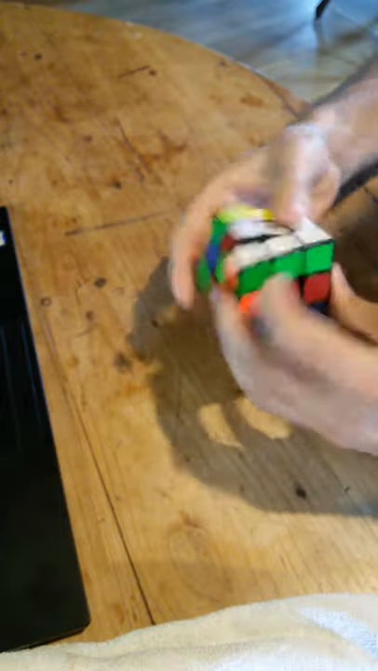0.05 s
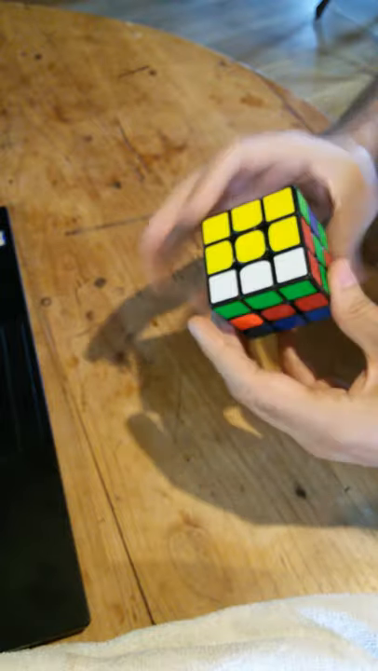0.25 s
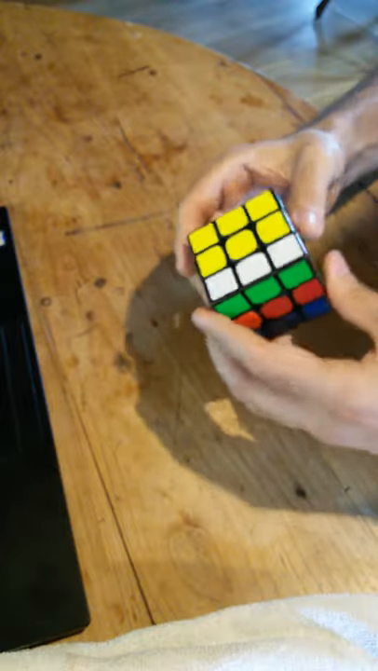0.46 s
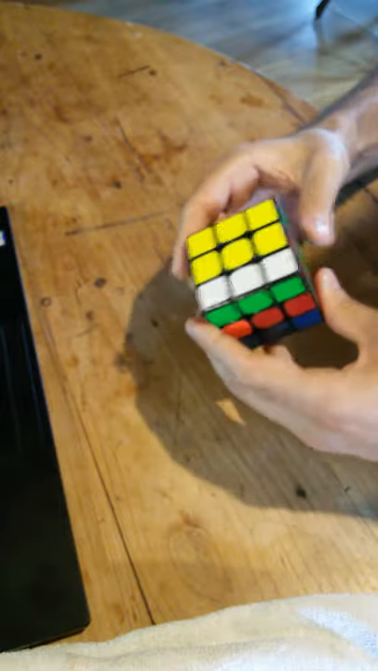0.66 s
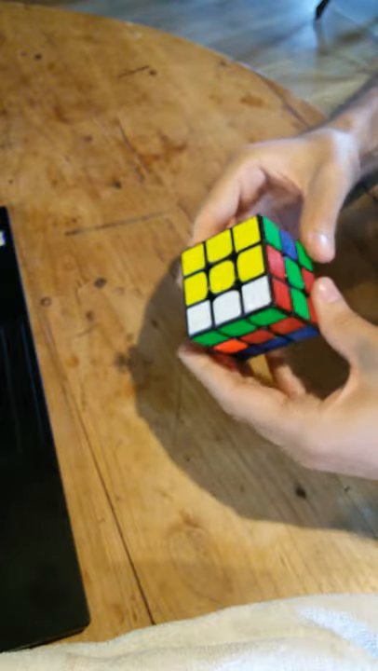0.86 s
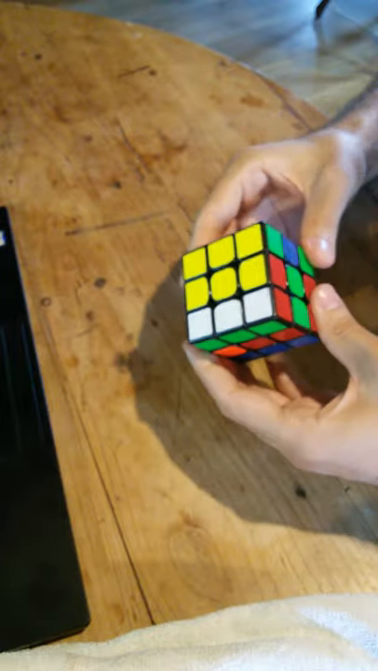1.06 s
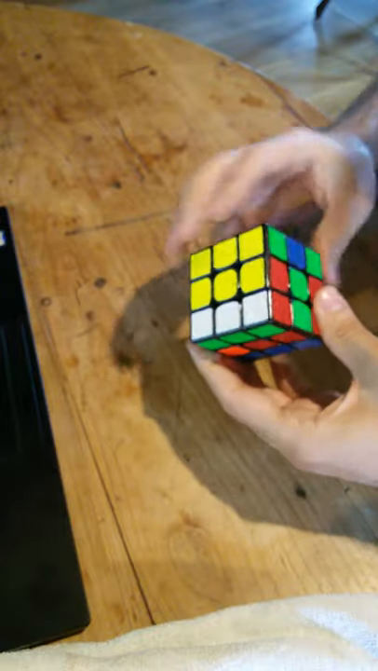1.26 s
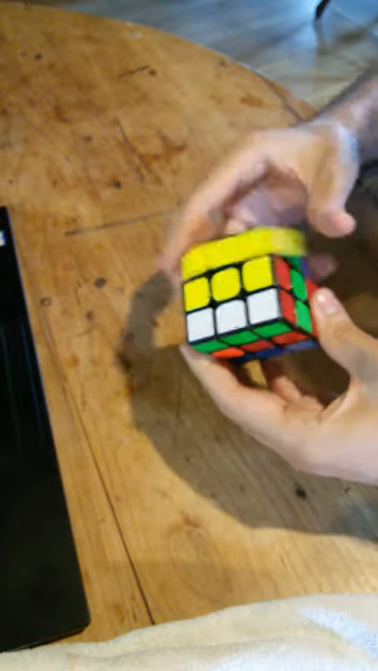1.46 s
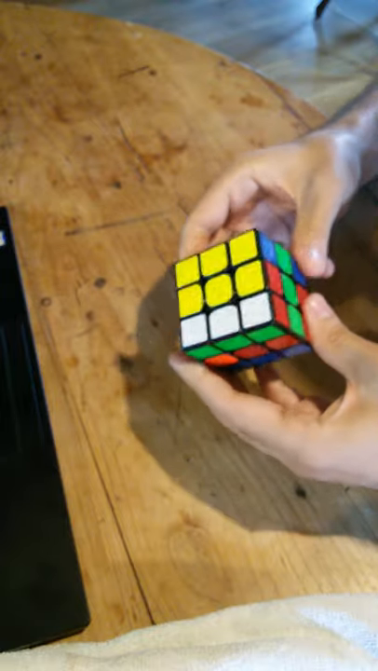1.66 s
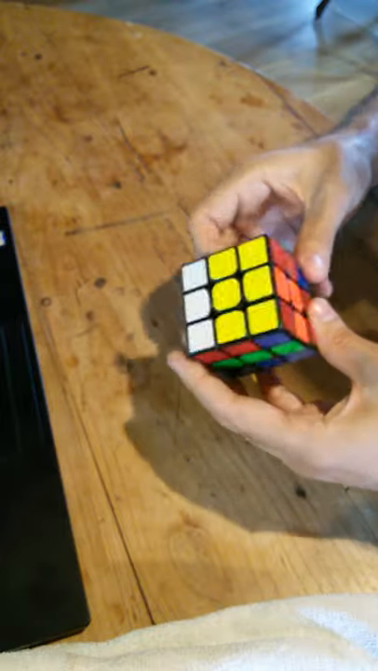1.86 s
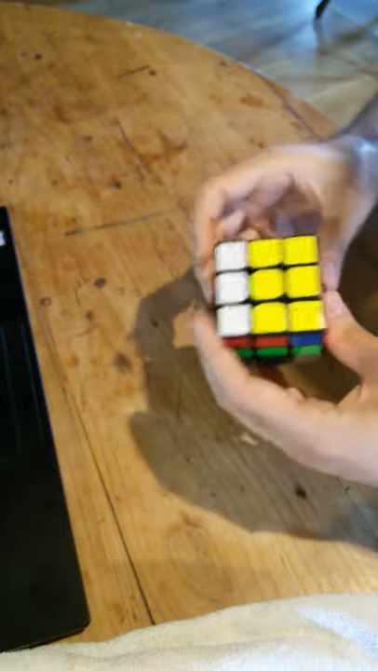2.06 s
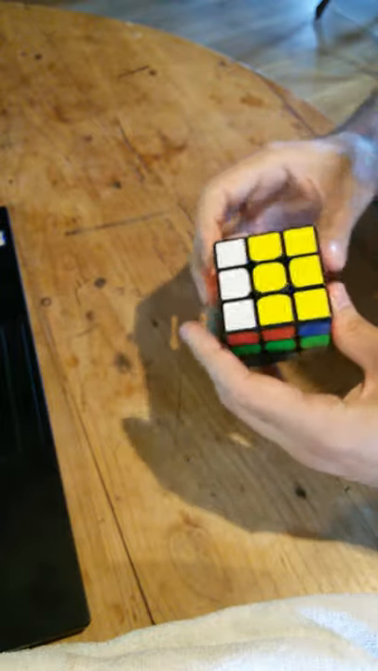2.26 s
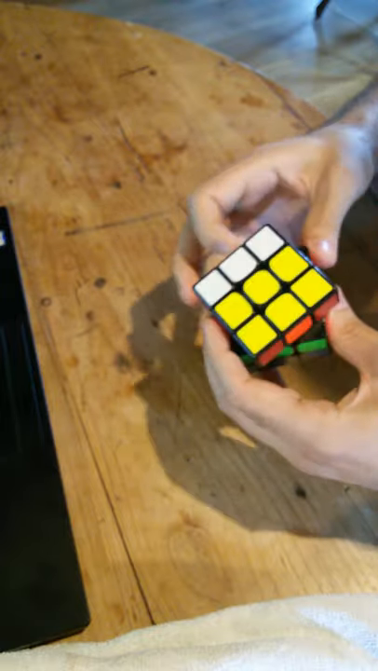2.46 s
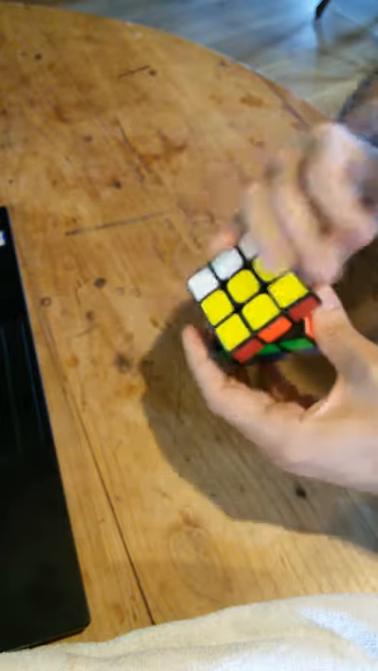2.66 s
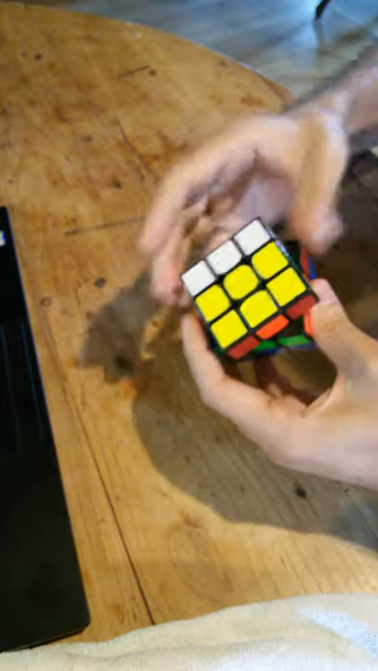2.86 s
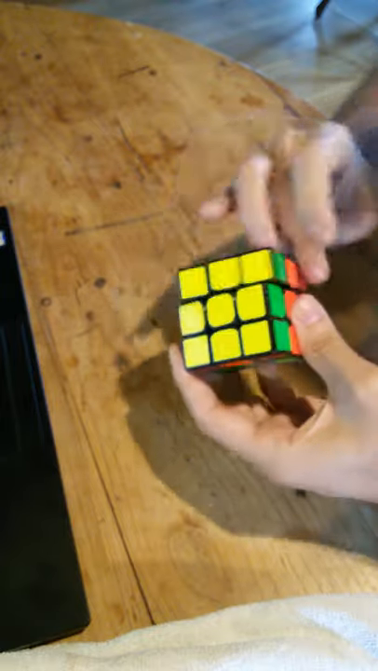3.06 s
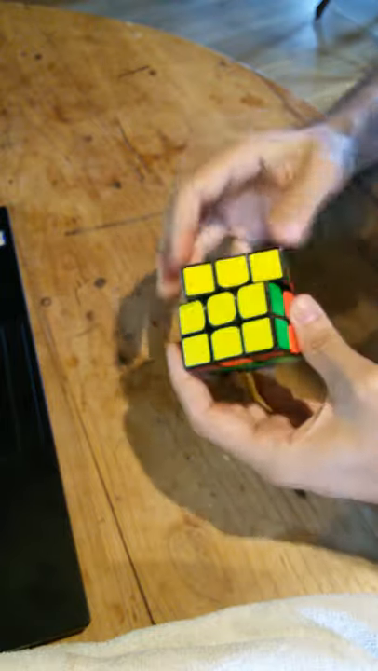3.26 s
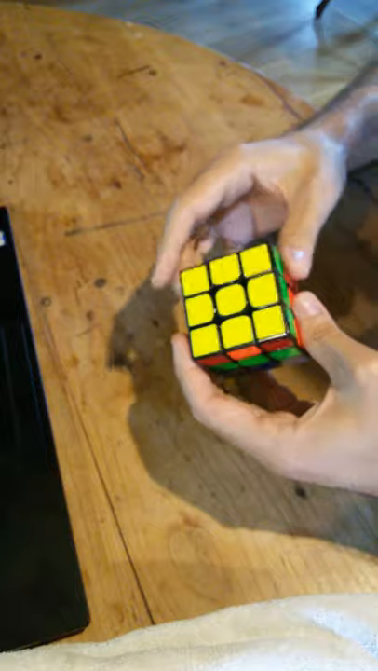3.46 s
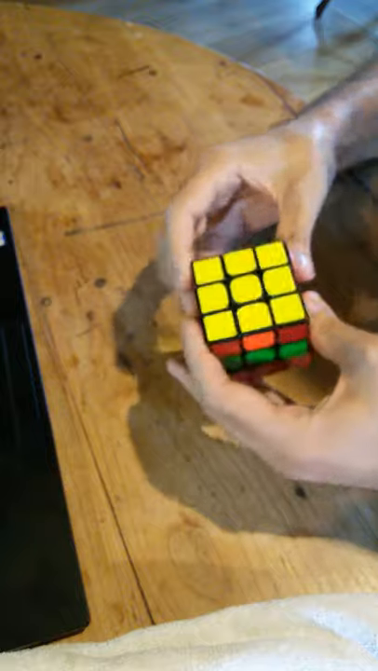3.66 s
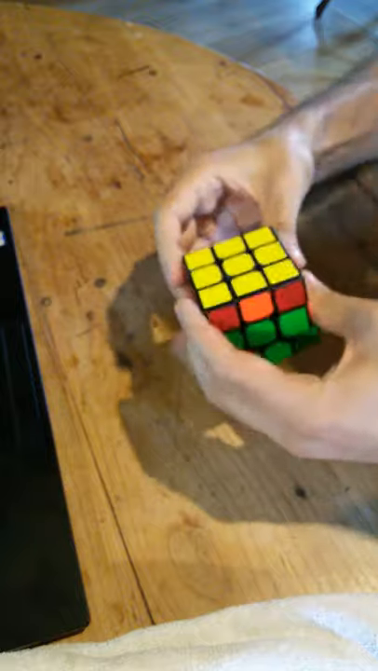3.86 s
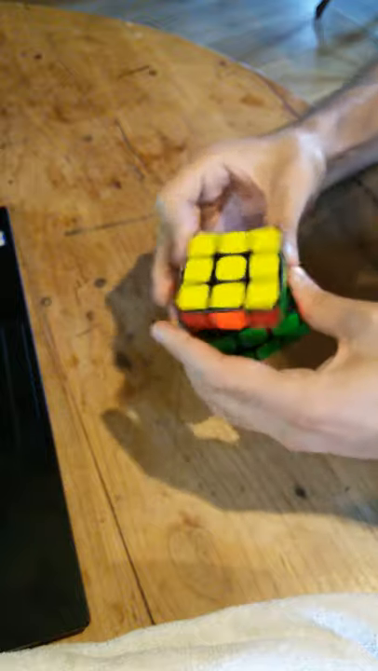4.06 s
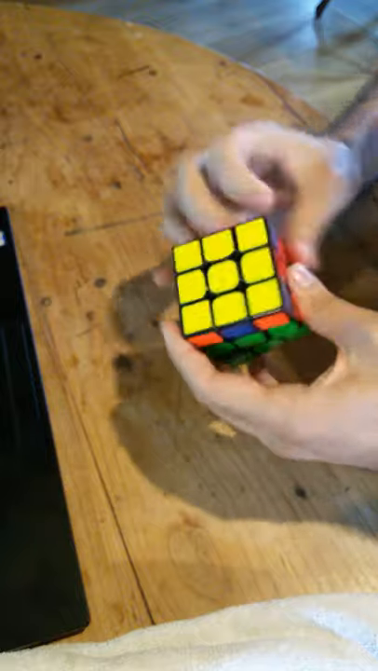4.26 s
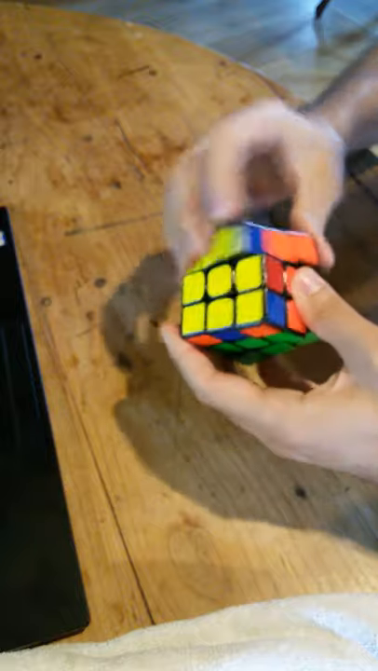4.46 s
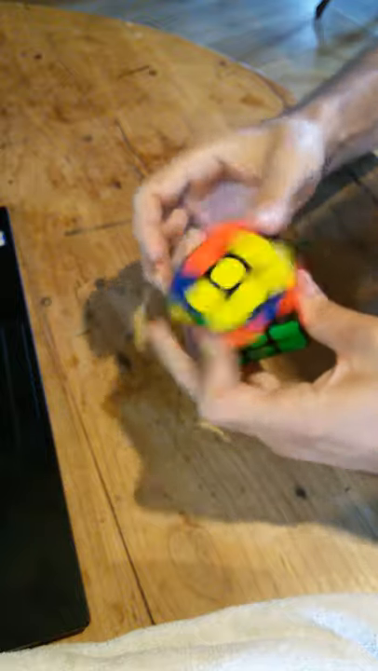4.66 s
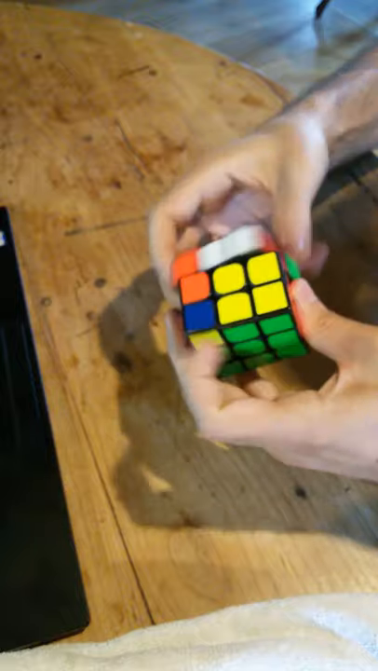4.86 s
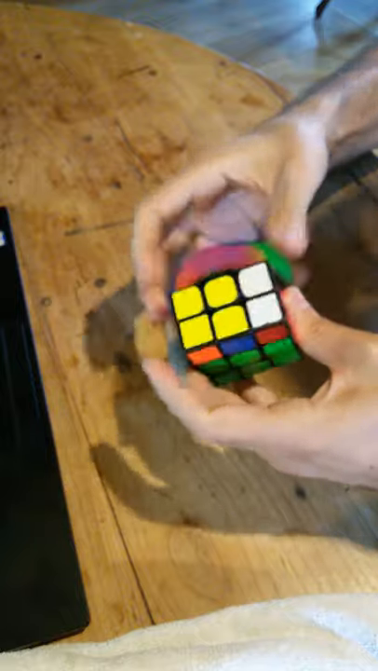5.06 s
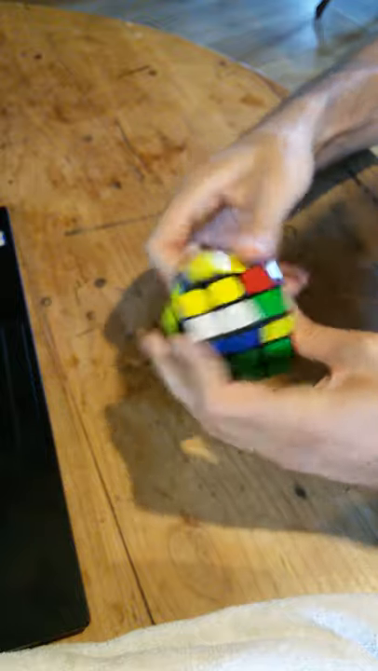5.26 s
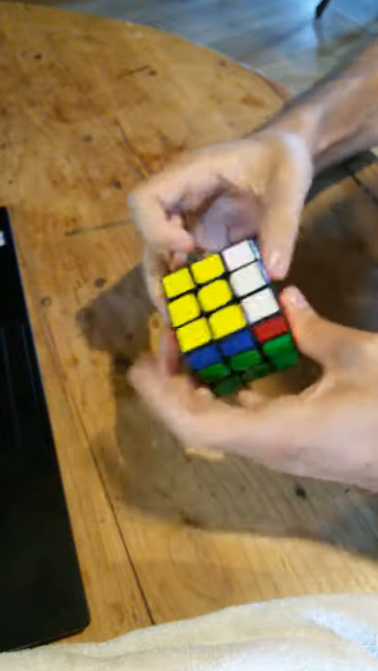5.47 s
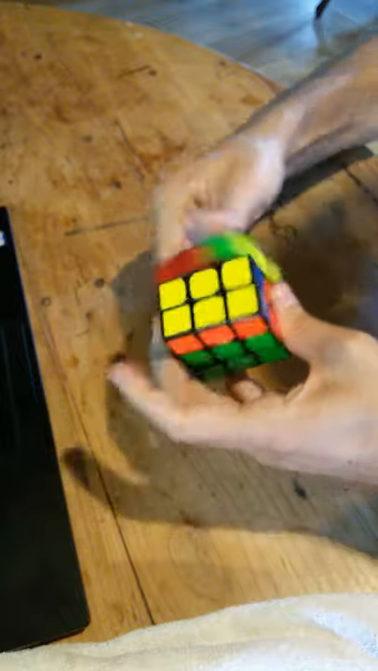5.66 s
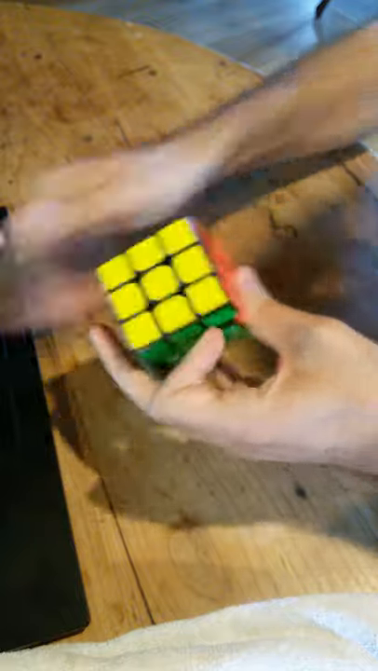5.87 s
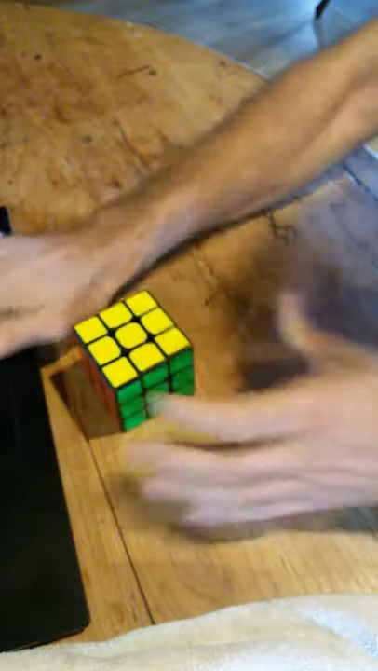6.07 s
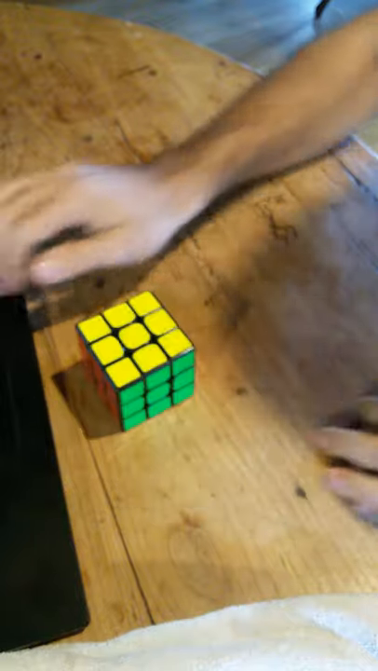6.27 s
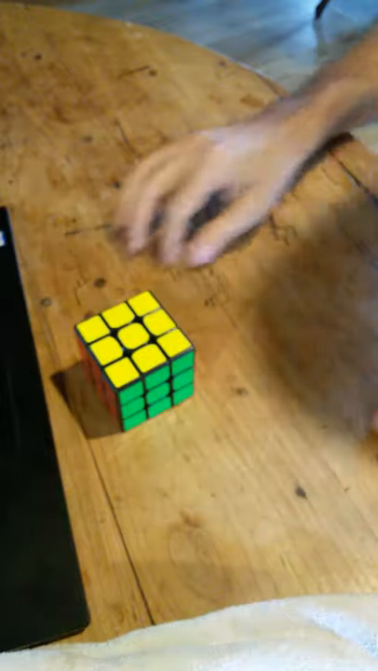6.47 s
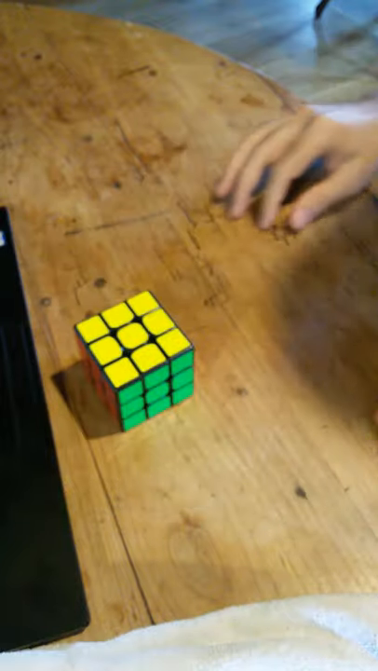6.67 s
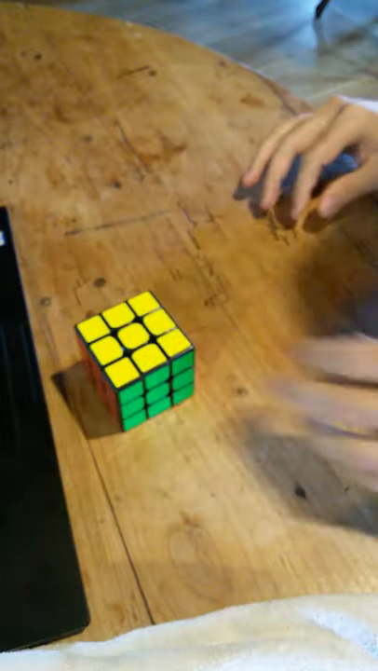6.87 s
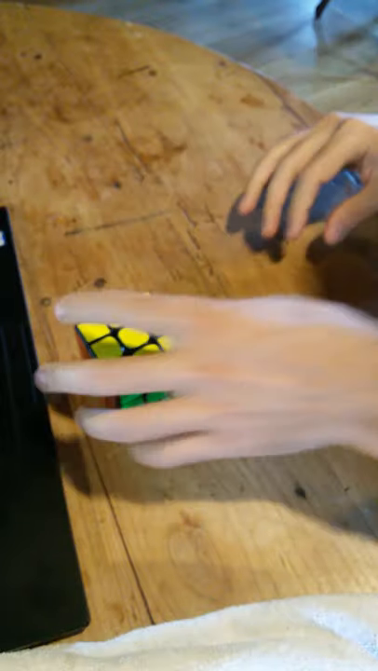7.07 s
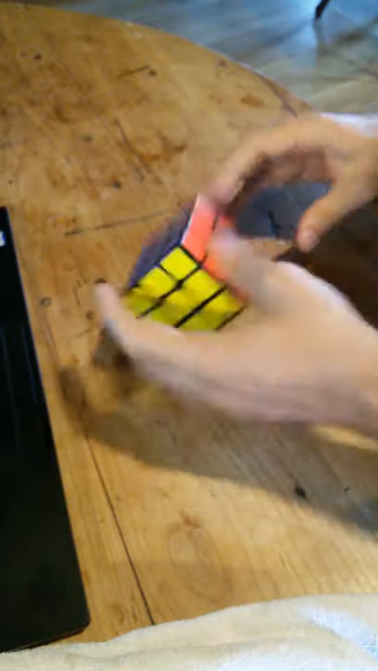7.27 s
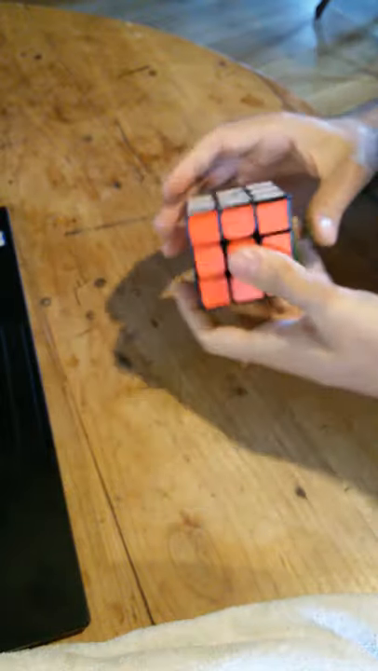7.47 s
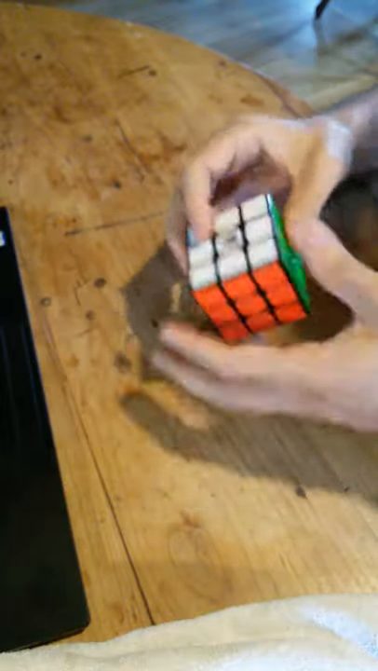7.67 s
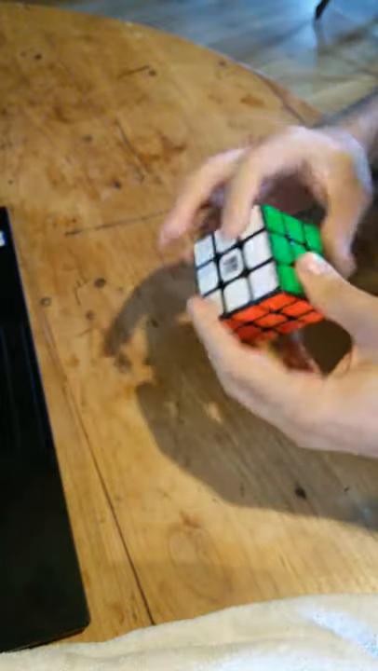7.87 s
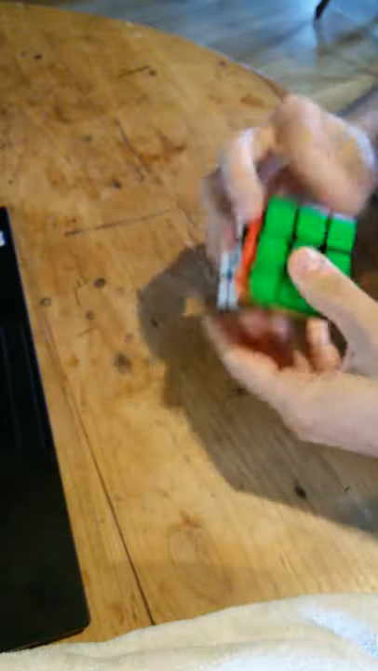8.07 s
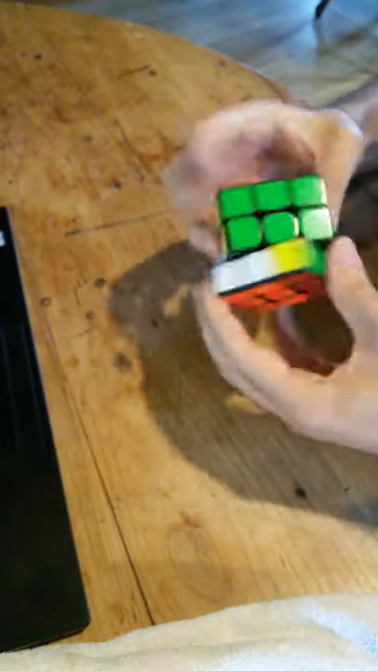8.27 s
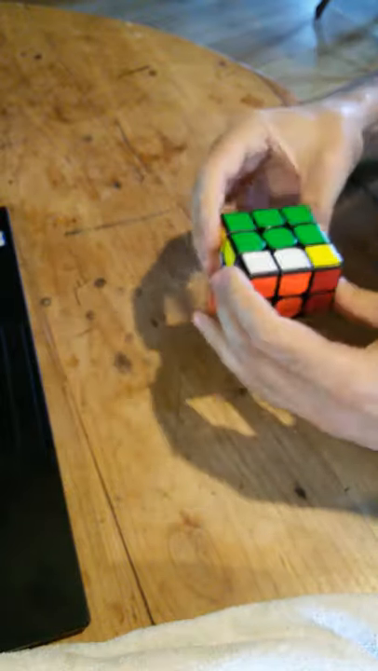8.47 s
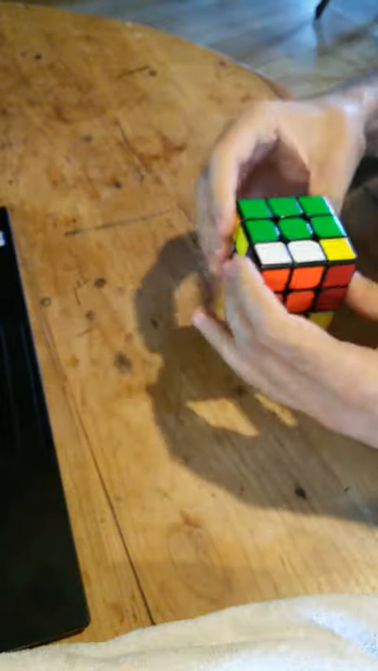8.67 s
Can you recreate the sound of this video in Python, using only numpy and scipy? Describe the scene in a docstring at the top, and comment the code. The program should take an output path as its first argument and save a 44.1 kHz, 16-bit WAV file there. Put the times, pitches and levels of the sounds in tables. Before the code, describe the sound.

Bright, dry plastic clacks with fine layer scraping come in short bursts, then speed into one continuous clattering run. A woody thud with loose rattle stops it abruptly. The small room is almost silent, with a faint hush and short tail; a soft hand slap follows, then light handling on wood and several moderate clicks, all heard closely and nearly centred.

```python
"""A plastic speed cube is turned in flurries above a wooden table: each clack is an impact that excites
the damped modes of a hollow piece, between layers that slide with a fine rattle and catch on their pieces.
After the last fast run the cube lands and a hand slams down: table modes, a noisy thud and loose rattle.
Then comes a soft slap, a filtered noise burst, and the cube is picked up and turned again.
A decaying diffuse tail and a steady hush of shaped noise form the quiet room."""
import sys
import numpy as np
from scipy import signal
from scipy.io import wavfile
from scipy.ndimage import uniform_filter1d

SR = 44100
rng = np.random.default_rng(int(sys.argv[2]) if len(sys.argv) > 2 else 0)


def to_wav(sig):
    """Store sig (one row per channel, or 1-D mono) as 16-bit WAV at the path in sys.argv[1].

    Samples outside -1..1 are clipped; the rate is SR.
    """
    pcm = np.clip(np.atleast_2d(sig), -1, 1) * 32767
    pcm = np.round(pcm).astype(np.int16)
    wavfile.write(sys.argv[1], SR, pcm.T)  # frames by channels


N = 384552  # length in samples

# Distinct clacks, as a layer is flicked off or snaps home: (time [s], ring level [dB], piece pitch [Hz])
CLACKS = [(.1066, -36.5, 5255), (.161, -24.5, 5200), (.1853, -16, 5420), (.2111, -23.5, 5500),
          (.2332, -32, 6000), (.4126, -53.5, 5490), (.5452, -41, 5550), (1.5002, -30, 5560),
          (1.5162, -49, 5550), (1.8166, -45.5, 5900), (2.397, -26, 5450), (2.69, -55, 5550),
          (2.7314, -35.5, 5970), (3.0052, -29, 5100), (3.0126, -24.5, 5820), (3.028, -27, 5200),
          (3.0652, -25, 5300), (3.072, -24.5, 5330), (3.0933, -32.5, 5270), (3.1141, -28.5, 5460),
          (3.4553, -57, 4890), (3.6306, -37, 4900), (3.653, -20, 5880), (3.8507, -36.5, 5400),
          (3.8763, -16, 5480), (4.1874, -38.5, 5200), (4.217, -48, 5840), (4.263, -22.5, 5800),
          (4.2752, -23.5, 5220), (4.2949, -30.5, 5700), (4.5322, -52, 5380), (4.589, -28, 5370),
          (4.6252, -34.5, 5070), (4.7255, -29, 5570), (4.7805, -25.5, 5480), (4.7893, -32.5, 5230),
          (4.822, -30.5, 6160), (4.883, -18, 5580), (4.92, -29, 5700), (4.9783, -32.5, 5900),
          (5.0175, -26.5, 5180), (5.0335, -27.5, 6070), (5.0641, -17.5, 6080), (5.1625, -25, 5580),
          (5.179, -16.5, 5900), (5.1938, -25, 5320), (5.2074, -28, 5370), (5.2584, -30.5, 5460),
          (5.2789, -12.5, 5500), (5.3128, -19.5, 5900), (5.3252, -23, 5370), (5.367, -40, 5140),
          (5.4078, -18, 5840), (5.4237, -16, 5400), (5.4963, -24, 5780), (5.5604, -30, 5400),
          (5.6294, -23.5, 5800), (5.643, -20.5, 5070), (5.6675, -14.5, 6040), (5.681, -22, 6100),
          (5.7125, -26.5, 5200), (5.7355, -20.5, 5330), (5.7518, -24.5, 5900), (5.7963, -26, 6150),
          (5.8129, -25, 5500), (5.831, -31.5, 5740), (5.8737, -28, 6100), (5.9062, -11, 5610),
          (7.8512, -53.5, 5270), (7.8772, -57.5, 6320), (8.1373, -35, 5570), (8.1659, -21.5, 5480),
          (8.2059, -23, 5560), (8.2344, -27.5, 5950), (8.3425, -43.5, 5940), (8.3715, -28.5, 5570),
          (8.475, -47, 5500), (8.567, -33, 5870), (8.59, -31, 4950), (8.6276, -33.5, 5850)]
# Sliding of a layer, one row a turn: (start [s], end [s], force [dB])
TURNS = [(0.067, 0.089, -55.5), (0.127, 0.17, -41), (0.17, 0.239, -38.5), (1.405, 1.432, -55.5),
         (1.433, 1.535, -42), (1.791, 1.861, -50), (2.383, 2.414, -46), (2.62, 2.72, -69),
         (2.972, 3.006, -57), (3.009, 3.102, -35), (3.628, 3.658, -43), (3.809, 3.846, -51.5),
         (3.851, 3.89, -37), (4.112, 4.18, -59.5), (4.185, 4.225, -46), (4.266, 4.294, -37.5),
         (4.56, 4.621, -42), (4.698, 4.745, -51), (4.757, 4.935, -36), (5.005, 5.055, -33.5),
         (5.151, 5.212, -26.5), (5.269, 5.341, -28.5), (5.351, 5.45, -28.5), (5.485, 5.614, -38.5),
         (5.622, 5.688, -29), (5.7, 5.818, -34), (5.875, 5.914, -30.5), (8.113, 8.235, -43.5),
         (8.324, 8.399, -42), (8.545, 8.685, -45)]
# Modes of a hollow piece: (multiple of its pitch [ratio], level [dB], T60 [s])
PIECE_MODES = [(.53, -21, 0.0058), (.82, -7, 0.0047), (.91, -3.5, 0.0086), (1.02, -2, 0.0079),
               (1.12, -2, 0.0074), (1.29, -2.5, 0.0038), (1.48, -12, 0.0054)]
# Whole cube knocking in the hands: (frequency [Hz], relative density [dB per Hz])
KNOCK_SPECTRUM = [(40, -21), (120, -19.5), (450, -9), (800, -1), (1150, -5.5), (1450, 0.5), (1800, -2.5),
                  (2150, 2), (2550, -3), (3000, 2.5), (4000, 4.5), (6000, -15), (12000, -38)]
# Snap of hard edges: (frequency [Hz], relative density [dB per Hz])
SNAP_SPECTRUM = [(3000, -42.5), (6500, -5.5), (8500, -1), (9800, -5), (12000, -8), (14500, -14.5)]
# Many pieces rattling at once: (frequency [Hz], relative density [dB per Hz])
RATTLE_SPECTRUM = [(100, -31.5), (500, -22.5), (900, -17.5), (2500, -23.5), (4000, -18), (4800, -7.5),
                   (5900, -8), (7200, -14), (9500, -27), (12000, -30.5), (14500, -36.5)]
# Soft bumps of the fingers: (frequency [Hz], relative density [dB per Hz])
HANDLING_SPECTRUM = [(20, -1.5), (50, -4), (200, -3.5), (400, -11.5), (1000, -18), (4000, -41.5)]
# Blows on the table, as the cube lands, the hands come down and settle, and it is picked up:
# (time [s], wood level [dB], centre of the blow [Hz], its spread [octaves],
#  rattle level [dB], rattle T60 [s], room send before the common send gain [dB])
BLOWS = [(6.017, -36.5, 990, 0.61, -40, 0.045, -14.5), (6.066, -51.5, 170, 0.59, -72, 0.018, -17),
         (6.0884, -26, 900, 2.8, -14.5, 0.034, -18), (6.0924, -29, 420, 1.6, -17.5, 0.053, 5),
         (6.1088, -23.5, 519, 1.55, -17.5, 0.077, 1.5), (6.342, -59, 109.5, 0.6, -73.5, .05, -12),
         (6.402, -59, 130.4, 0.76, -62, 0.31, -11), (7.226, -55, 706, 2.1, -53, 0.018, 3),
         (7.234, -50, 150.5, 0.34, -71, 0.028, -4.5), (7.2884, -55, 159, 0.54, -52, 0.057, -14),
         (7.307, -57.5, 1286, 1.65, -59, 0.061, -4)]
# Modes of the table top: (frequency [Hz], level [dB], T60 [s])
WOOD_MODES = [(97.7, -5.5, 0.4), (139, -1, 0.046), (184.3, -4.5, 0.15), (238.2, 0.5, .1),
              (319.3, -5.5, 0.09), (463, -2, 0.14), (527, -1.5, 0.083), (653, -6.5, 0.13),
              (786, -3.5, 0.079), (1054, -2.5, 0.053)]
# Noisy thud of the table top: (frequency [Hz], relative density [dB per Hz])
THUD_SPECTRUM = [(30, -29), (70, -16.5), (130, -1), (600, -3.5), (1100, -3.5), (1800, -11), (5000, -3.5),
                 (9000, -29.5), (15000, -42.5)]
# Soft slap of a hand: (frequency [Hz], relative density [dB per Hz])
SLAP_SPECTRUM = [(100, -14), (200, -8.5), (300, 2.5), (430, -3), (600, 1.5), (1000, -4.5), (2500, -5),
                 (5000, 2), (6200, -3.5), (7500, -12.5), (14000, -27.5)]
# Decay of the room: (frequency [Hz], T60 [s])
ROOM_T60 = [(100, 0.44), (300, 0.37), (1000, .31), (3000, 0.33), (6000, 0.28), (10000, 0.29), (15000, 0.23)]
# Colour of one diffuse tail, before send gains: (frequency [Hz], level [dB])
ROOM_LEVEL = [(100, 0), (500, -3.5), (1500, -5), (3000, -8.5), (5500, -12), (9000, -9), (15000, -5.5)]
# Early reflections of the cube: (delay [s], level [dB])
ECHOES = [(.0022, -15.5), (.0083, -17), (0.0109, -20)]
# Quiet air of the room: (frequency [Hz], relative density [dB per Hz])
HUSH_SPECTRUM = [(15, -42), (25, -3), (69, -6.5), (101, -4), (237, -6.5), (326, -9), (415, -12.5),
                 (450, -12), (879, -15.5), (1910, -20), (2300, -19.5), (2780, -21.5), (13800, -22),
                 (15000, -25)]

HUSH_DB = -68  # rms
EDGE_HZ = 14800  # upper band limit
# A clack of middling strength: its ring in dB, and its knock and snap in dB re the ring
USUAL_DB, KNOCK_DB, SNAP_DB = -34, -13, -16.5
KNOCK_FALL, SNAP_FALL = 0.15, 0.097  # dB per dB: the harder the clack, the more its ring dominates
CATCHES_PER_S, CATCH_UNEVEN = 85, 0.7  # mean rate; half-range of a gap as a fraction of the mean gap
CATCH_HZ, CATCH_OCTAVES = 5580, 0.17  # reference pitch and scale of its scatter


def amp(db):
    """Logarithmic level: decibels to amplitude gain."""
    return 10 ** (np.asarray(db) / 20)


def read(points, hz):
    """Spectral interpolation: straight lines over log frequency."""
    f, value = np.transpose(points)
    return np.interp(np.log(hz + 1), np.log(f + 1), value)


def dying(t, t60):
    """Exponential decay: the amplitude falls by 60 dB in t60 seconds."""
    return np.exp(-np.log(1000) * t / t60)


def sized(x, seconds):
    """Energy normalization: x gets the energy of unit rms held for that long."""
    energy = np.sum(x ** 2) + 1e-20
    return x * np.sqrt(seconds * SR / energy)


def add(mix, s, sound):
    """Linear superposition: mixes a sound in at time s, in seconds."""
    part = mix[round(s * SR):][:len(sound)]
    part += sound[:len(part)]


def colour(x, spectrum, size=2048):
    """Minimum-phase filtering: a causal response of the given spectrum keeps attacks sharp."""
    hz = abs(np.fft.fftfreq(size, 1 / SR))
    log_gain = np.log(amp(read(spectrum, hz)))
    response = np.exp(np.conj(signal.hilbert(log_gain)))
    taps = np.fft.ifft(response).real
    return signal.fftconvolve(x, taps[:size // 2])[:len(x)]


def hush():
    """Stationary random noise: the quiet air of the room has a fixed spectrum and rms level."""
    air = colour(rng.standard_normal(N), HUSH_SPECTRUM, size=8192)
    return amp(HUSH_DB) * sized(air, N / SR)


def handling(level_db=-52, follow=0.67, width_s=0.082):
    """Energy-driven noise: soft finger bumps follow the smoothed effort of turns and clacks."""
    effort = np.zeros(N)
    for start, end, force_db in TURNS:
        moving = np.ones(max(round((end - start) * SR), 1))
        add(effort, start, amp(force_db) ** 2 * CATCHES_PER_S / SR * moving)
    for s, ring_db, _ in CLACKS:
        add(effort, s, amp([ring_db]) ** 2)
    t = np.arange(-SR // 4, SR // 4 + 1) / SR
    window = np.exp(-(t / width_s) ** 2)  # the grip tightens before an event and relaxes after it
    grip = np.sqrt(abs(signal.fftconvolve(effort, window, "same")))
    bumps = sized(colour(rng.standard_normal(N), HANDLING_SPECTRUM), N / SR)
    return amp(level_db) * grip ** follow * bumps


def scraping(level_db=-21, follow=0.72, ticks_per_s=700, spread_db=4, rub_db=-27):
    """Stick-slip friction: random edge ticks over a soft rub, gated by the motion of each layer."""
    motion = np.zeros(N)
    for start, end, force_db in TURNS:
        moving = np.ones(max(round((end - start) * SR), 1))
        add(motion, start, amp(follow * force_db) * moving)
    strength_db = spread_db * np.minimum(rng.exponential(1, N), 3)
    sizes = amp(strength_db) * rng.choice([-1, 1], N)
    ticks = sizes * (rng.random(N) < ticks_per_s / SR)
    rub = amp(rub_db) * rng.standard_normal(N)
    friction = sized(colour(ticks + rub, RATTLE_SPECTRUM), N / SR)
    return amp(level_db) * uniform_filter1d(motion, size=150) * friction  # soft on and off


def contact(t, t60, grit):
    """Impulsive excitation: one sharp touch plus dying noise, grit being their amplitude ratio."""
    noise = rng.standard_normal(len(t)) * dying(t, t60)
    return (t == 0) + grit * sized(noise, 1 / SR)


def clack(ring_db, hz, knock_db, snap_db, rise_s=0.00069, chatter_s=0.0013, rebound_db=-9,
          knock_t60=0.03, snap_t60=0.022, grit=1.0, length=0.004, size=1000):
    """Modal impact: a struck piece rings and rebounds twice, with a cube knock and an edge snap."""
    t = np.arange(size) / SR
    ring = np.zeros(size)
    for k, (ratio, db, t60) in enumerate(PIECE_MODES):
        mode_hz = ratio * hz * rng.uniform(0.9306, 1.03)
        ring += (-1) ** k * amp(db) * dying(t, t60) * np.sin(2 * np.pi * mode_hz * t)
    ring *= 1 - np.exp(-(t / rise_s) ** 2)
    contacts = ring.copy()
    for delay in chatter_s * rng.uniform(0.2, 1, 2):
        add(contacts, delay, amp(rebound_db) * ring)
    knock = colour(contact(t, knock_t60, grit), KNOCK_SPECTRUM, size=1024)
    snap = colour(contact(t, snap_t60, grit), SNAP_SPECTRUM, size=256)
    strike = sized(contacts, length)
    strike += amp(knock_db) * sized(knock, length)
    strike += amp(snap_db) * sized(snap, length)
    return amp(ring_db) * strike


def catches(level_db=-1, spread_db=6.5, knock_db=-9, snap_db=-14, vary_db=5, count=26):
    """Irregular impact train: piece after piece of a sliding layer catches with a small clack."""
    pieces = []
    for pitch, hollow, sharp in rng.uniform(-0.9, 1, (count, 3)):
        hz = CATCH_HZ * 2 ** (CATCH_OCTAVES * pitch)
        pieces.append(clack(0, hz, knock_db + vary_db * hollow, snap_db + vary_db * sharp))
    out = np.zeros(N)
    for start, end, force_db in TURNS:
        uneven, strength = rng.uniform(-1, 1, (2, count))
        gaps = (1 + CATCH_UNEVEN * uneven) / CATCHES_PER_S
        times = start + np.cumsum(gaps) - gaps[0]  # the first catch opens the turn
        levels = level_db + force_db + spread_db * strength
        for s, db, k in zip(times, levels, rng.permutation(count)):
            if s < end:
                add(out, s, amp(db) * pieces[k])
    return out


def clacks(scatter=0, vary_db=2.5):
    """Level-dependent timbre: harder clacks ring more; scatter shifts each pitch for off-axis sound."""
    out = np.zeros(N)
    for s, ring_db, hz in CLACKS:
        detune, hollow, sharp = rng.uniform(-1, 1, 3)
        excess_db = ring_db - USUAL_DB
        knock_db = KNOCK_DB - KNOCK_FALL * excess_db + vary_db * hollow
        snap_db = SNAP_DB - SNAP_FALL * excess_db + vary_db * sharp
        add(out, s, clack(ring_db, hz * (1 + scatter * detune), knock_db, snap_db))
    return out


def room(x, gap=0.0075):
    """Diffuse reverberation: after a gap in seconds, a noise tail whose bands decay at their own rates."""
    hz, t, bands = signal.stft(rng.standard_normal(SR * 3 // 4), SR, nperseg=256)
    t60 = read(ROOM_T60, hz)[:, None]
    level = amp(read(ROOM_LEVEL, hz))[:, None]
    unit_energy = np.sqrt(2 * np.log(1000) / (t60 * SR))  # offsets the energy of a longer decay
    bands = bands * dying(t, t60) * level * unit_energy
    response = signal.istft(bands, SR, nperseg=256)[1]
    out = np.zeros(N)
    add(out, gap, signal.fftconvolve(x, response))
    return out


def blow(wood_db, centre_hz, octaves, rattle_db, rattle_t60, thud_db=2, thud_t60=0.047, length=0.017):
    """Band-limited modal excitation: the table top rings where the blow reaches, and loose pieces rattle."""
    t = np.arange(SR // 2) / SR
    modes = np.zeros(len(t))
    for hz, db, t60 in WOOD_MODES:
        modes += amp(db) * dying(t, t60) * np.sin(2 * np.pi * hz * t) * rng.choice([-1, 1])
    thud = colour(rng.standard_normal(len(t)) * dying(t, thud_t60), THUD_SPECTRUM)
    wood = sized(modes, length) + amp(thud_db) * sized(thud, length)
    grid = np.geomspace(20, 20000, 40)
    reach_db = -10 * np.log10(1 + (np.log2(grid / centre_hz) / octaves) ** 4)
    wood = colour(wood, np.column_stack([grid, reach_db]))
    rattle = colour(rng.standard_normal(len(t)) * dying(t, rattle_t60), RATTLE_SPECTRUM)
    return amp(wood_db) * sized(wood, length) + amp(rattle_db) * sized(rattle, length)


def table(to_room):
    """Superposed impacts: all the blows on the table, heard directly or as sent to the walls."""
    out = np.zeros(N)
    for s, wood_db, centre_hz, octaves, rattle_db, rattle_t60, room_db in BLOWS:
        stroke = blow(wood_db, centre_hz, octaves, rattle_db, rattle_t60)
        add(out, s, amp(room_db * to_room) * stroke)
    return out


def slap(s=7.013, level_db=-47, t60=0.43, grit=0.51, room_db=10, length=0.12, size=6000):
    """Reverberant burst: skin on skin gives a short filtered noise, heard mostly by way of the room."""
    t, direct, send = np.arange(size) / SR, np.zeros(N), np.zeros(N)
    burst = colour(rng.standard_normal(size) * dying(t, t60), SLAP_SPECTRUM)
    add(direct, s, amp(level_db) * sized(burst, length))
    touch = colour(contact(t, t60, grit), SLAP_SPECTRUM)
    add(send, s, amp(level_db + room_db) * sized(touch, length))
    return direct + room(send, gap=0.004)


def scene(cube_room_db=-5.0, table_room_db=-1.0, width_db=-19, count=3):
    """Mid-side superposition: everything sits in the middle; only the table blows spread a little."""
    slide = scraping() + handling() + catches()
    cube = clacks() + slide
    tail = np.zeros(N)
    # A hit radiates differently towards each wall, so the tail is smoother than the direct sound
    for _ in range(count):
        cube_send = amp(cube_room_db) * (clacks(scatter=0.11) + slide)
        table_send = amp(table_room_db) * table(to_room=True)
        tail += room(cube_send + table_send)
    mid = cube + table(to_room=False) + tail + slap() + hush()
    for delay, db in ECHOES:
        add(mid, delay, amp(db) * cube)
    side = amp(width_db) * table(to_room=False)
    return np.array([mid + side, mid - side])


def record(dry, low_cut_hz=42):
    """Transducer limits: the microphone sheds deep bass, the loudest peaks saturate, the band ends."""
    high_pass = signal.butter(1, low_cut_hz, "highpass", fs=SR, output="sos")
    heard = signal.sosfilt(high_pass, dry)
    rounded = heard / (1 + (heard / 0.95) ** 6) ** (1 / 6)
    band_limit = signal.firwin(301, EDGE_HZ, window=("kaiser", 8), fs=SR)
    return signal.oaconvolve(rounded, band_limit[None], "same")


dry = scene()
out = record(dry)
to_wav(out)
```